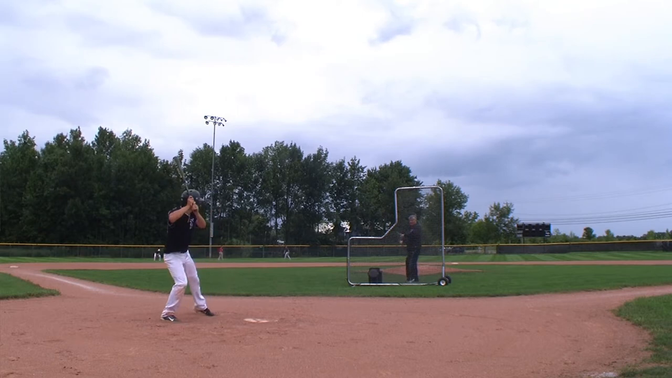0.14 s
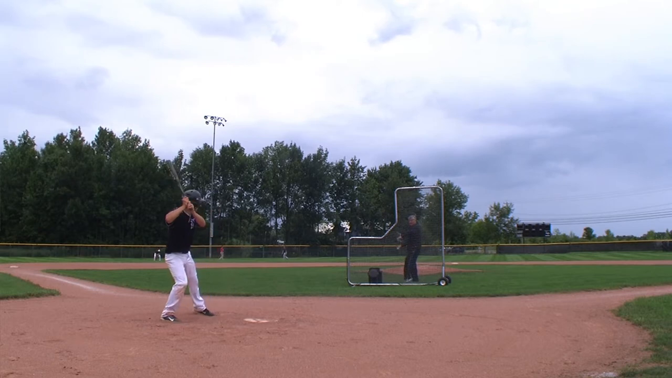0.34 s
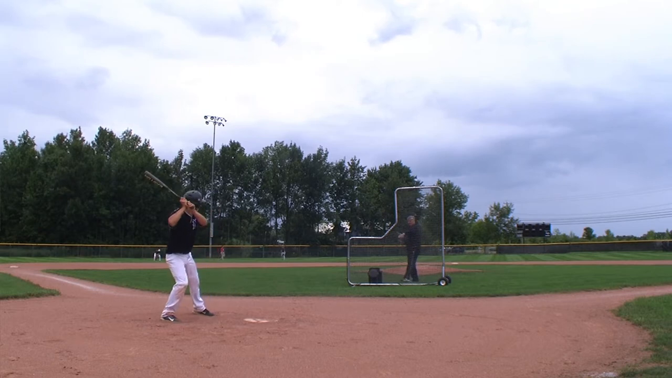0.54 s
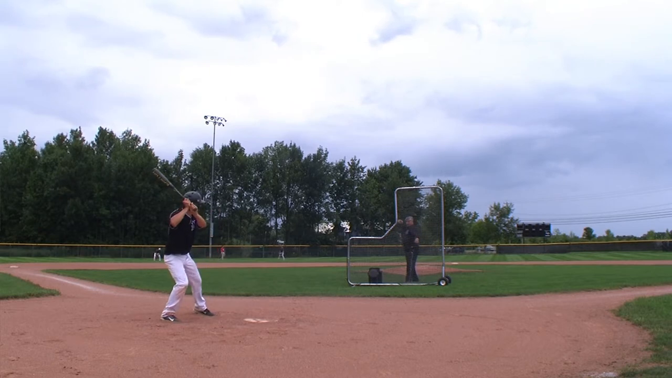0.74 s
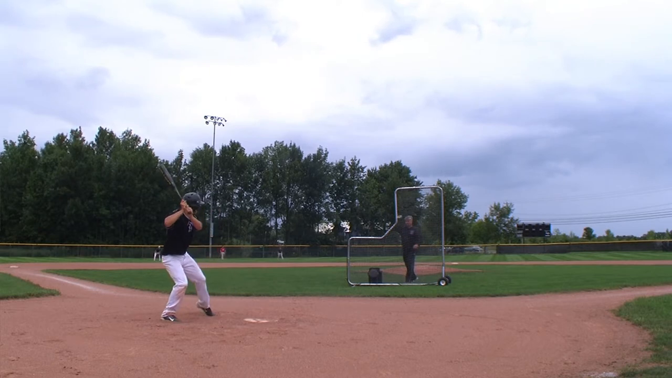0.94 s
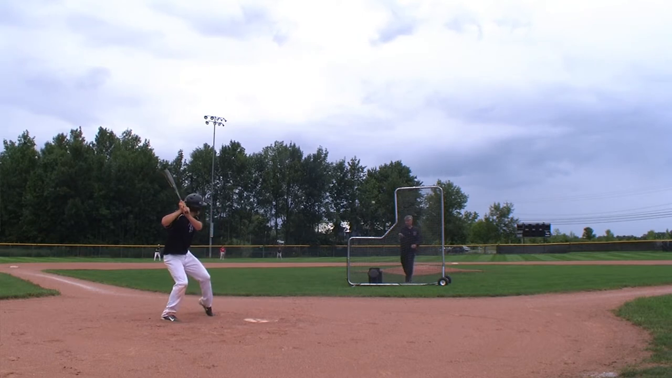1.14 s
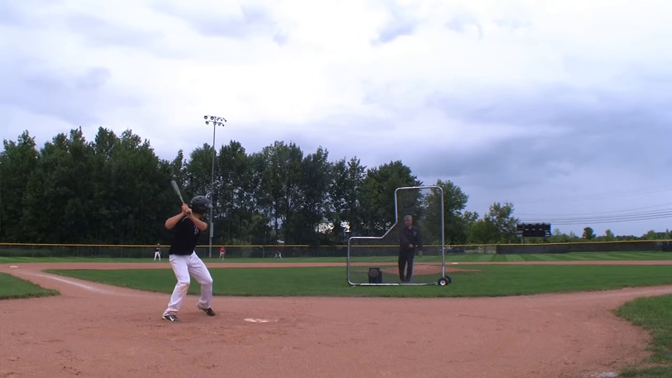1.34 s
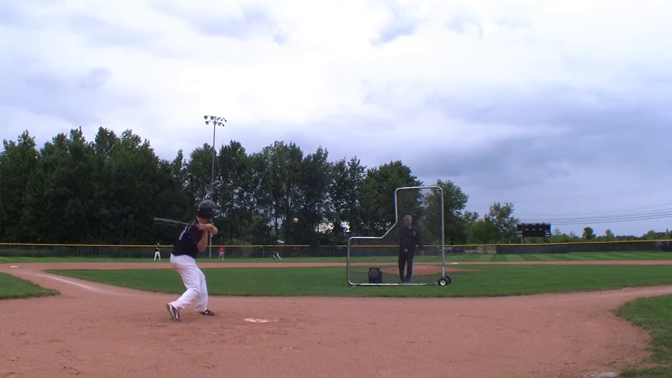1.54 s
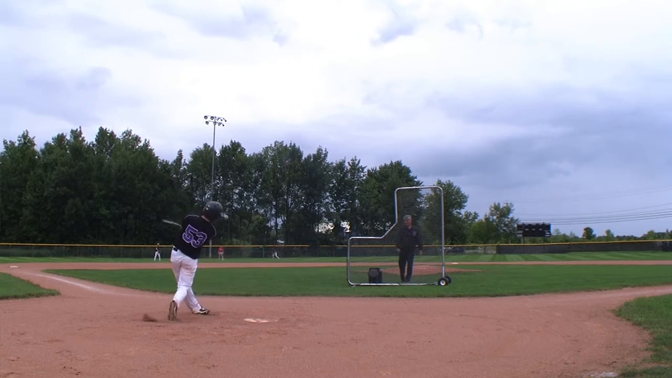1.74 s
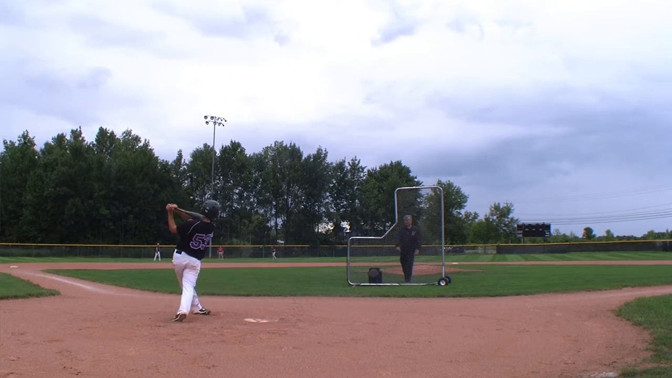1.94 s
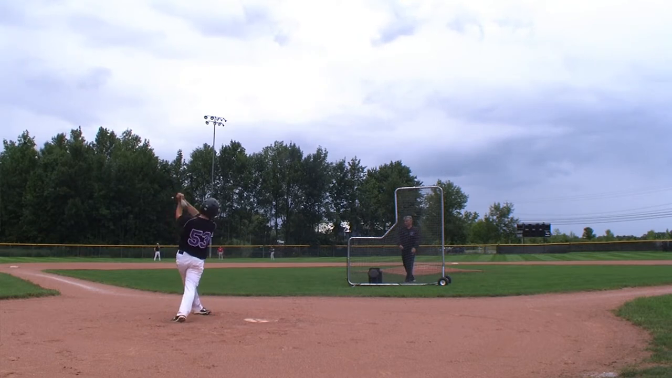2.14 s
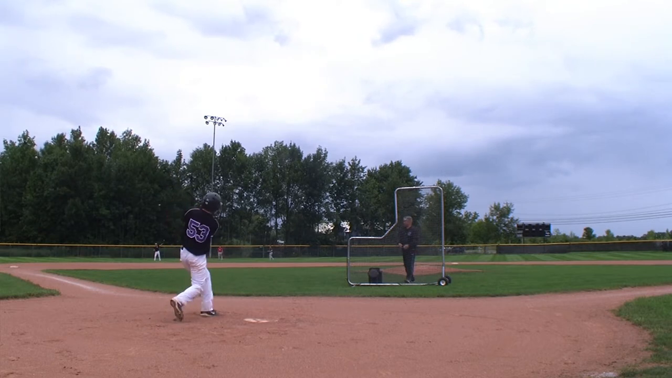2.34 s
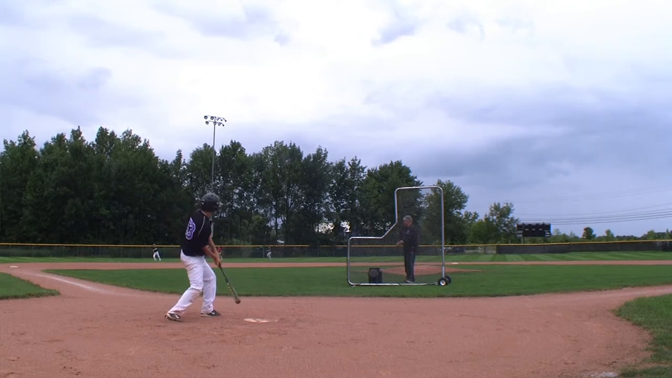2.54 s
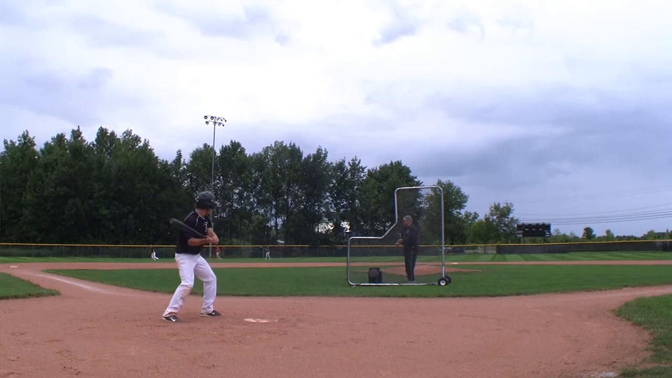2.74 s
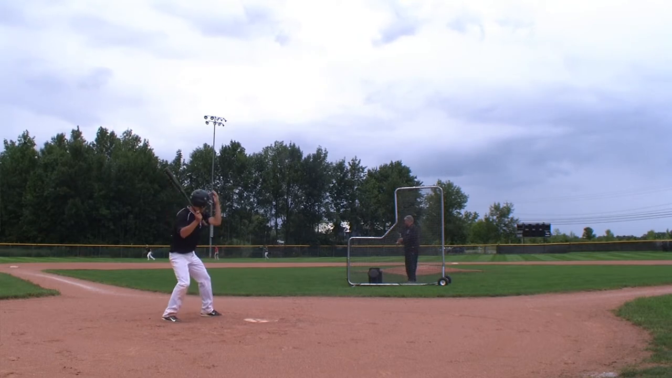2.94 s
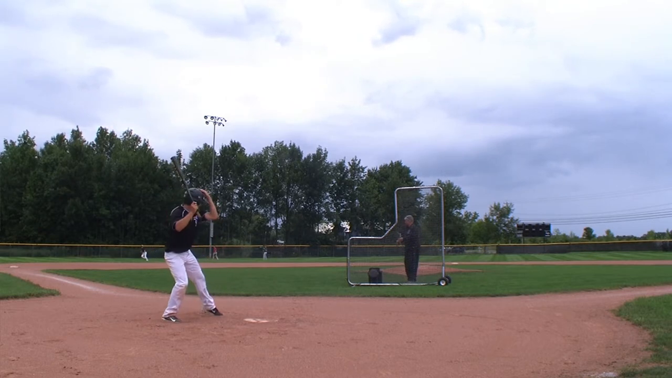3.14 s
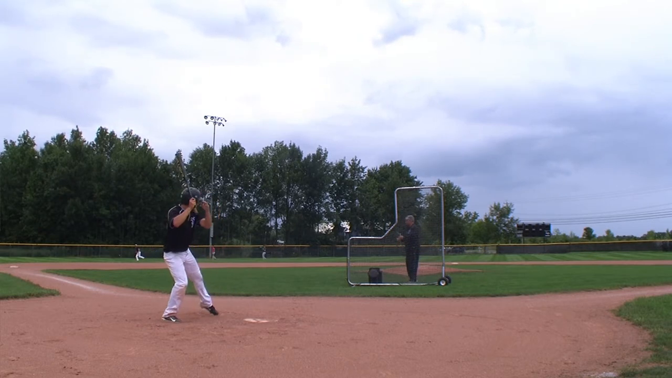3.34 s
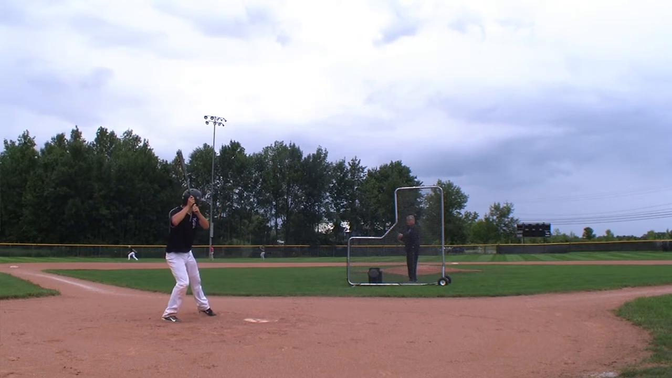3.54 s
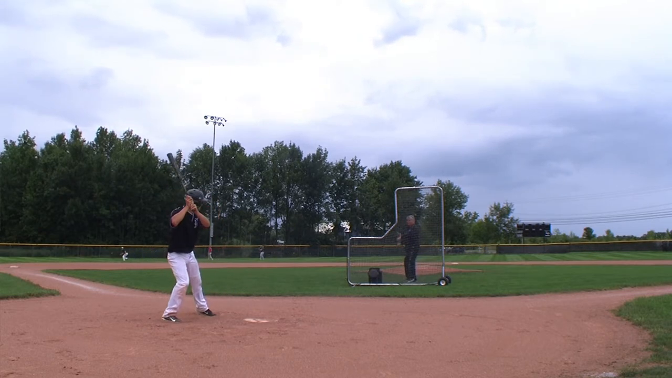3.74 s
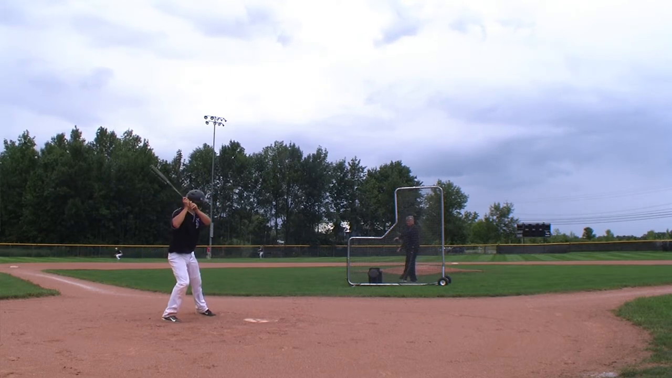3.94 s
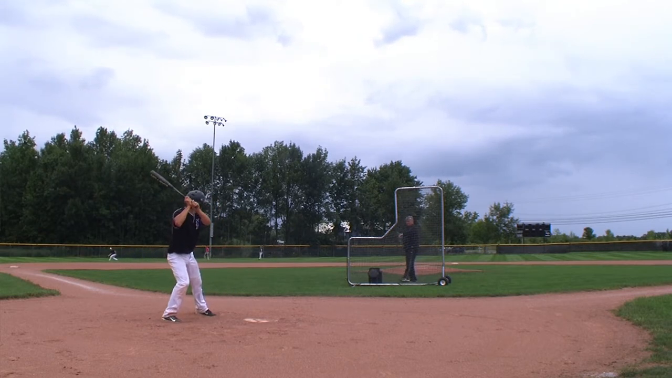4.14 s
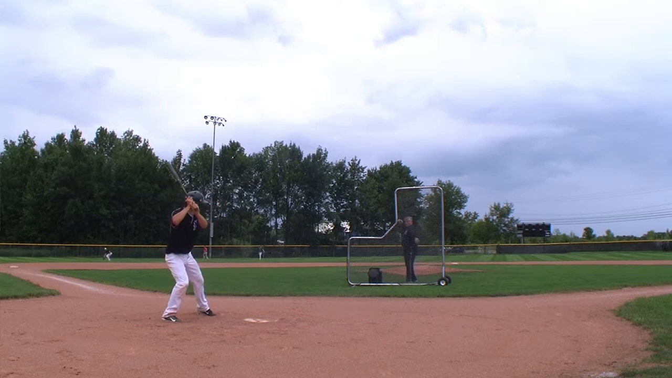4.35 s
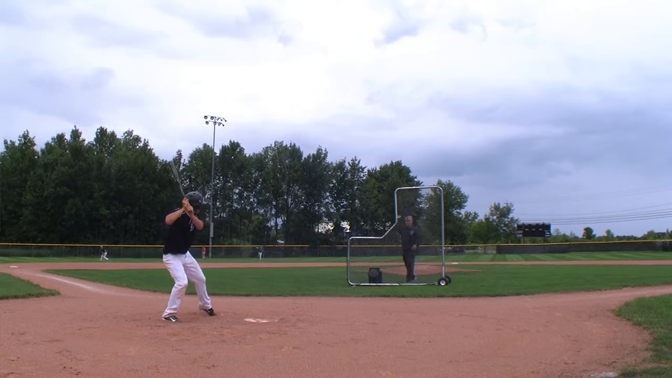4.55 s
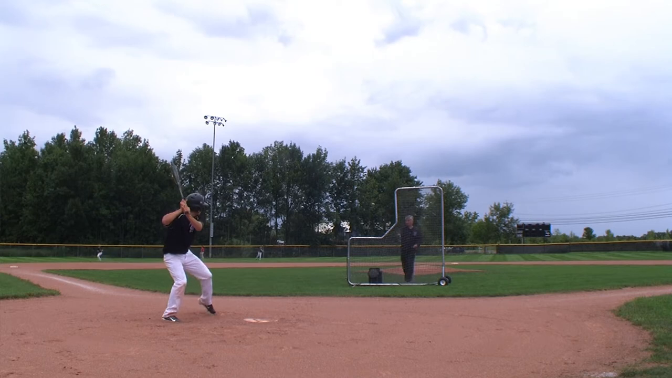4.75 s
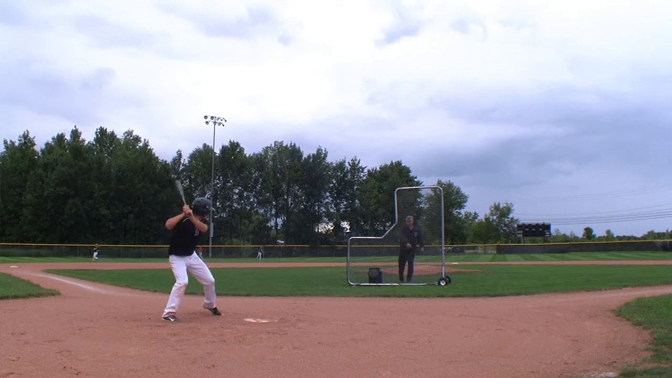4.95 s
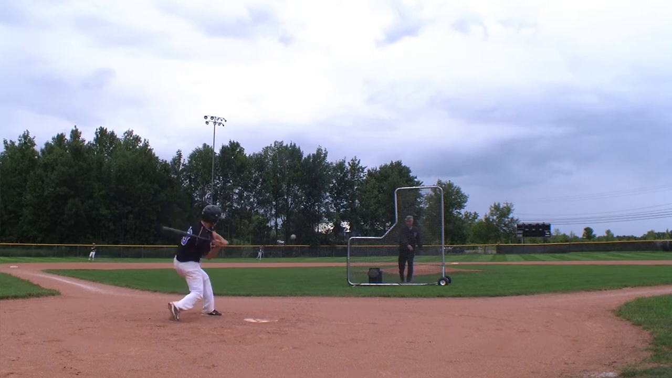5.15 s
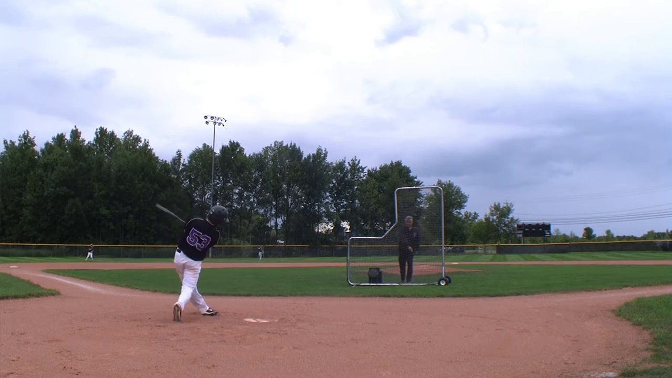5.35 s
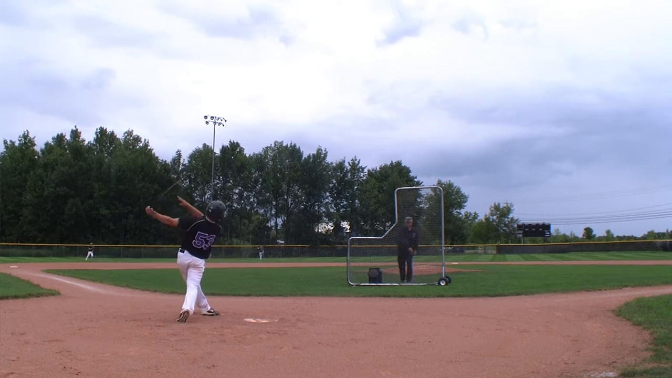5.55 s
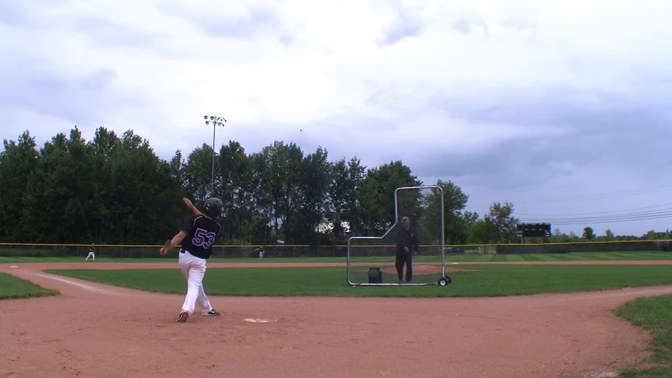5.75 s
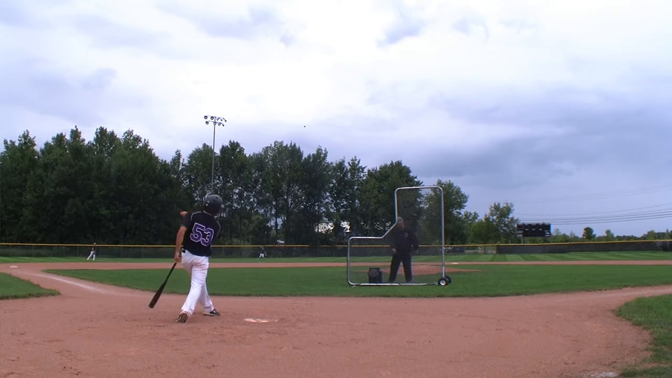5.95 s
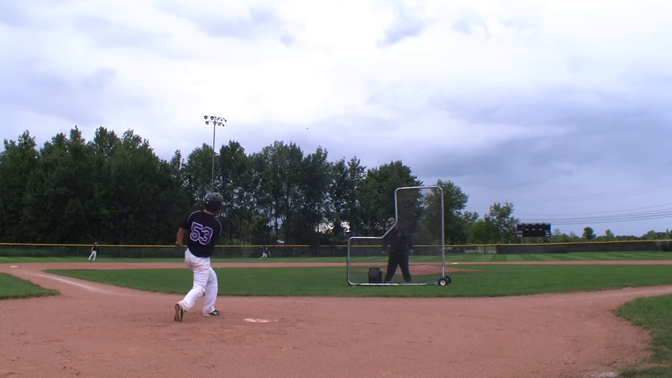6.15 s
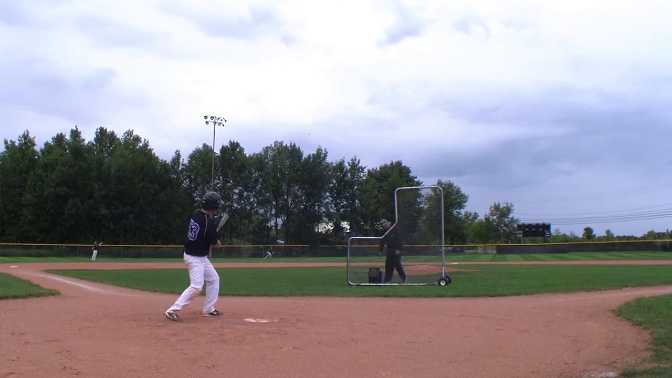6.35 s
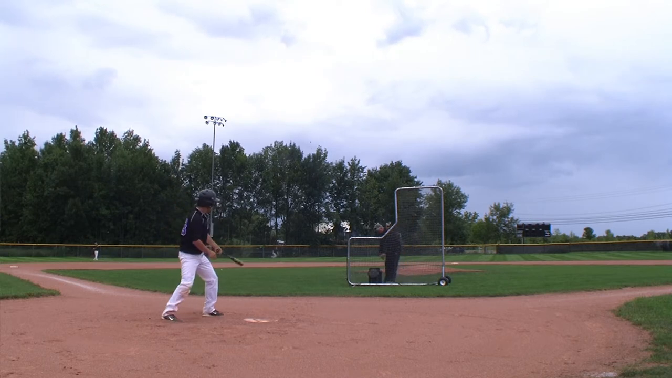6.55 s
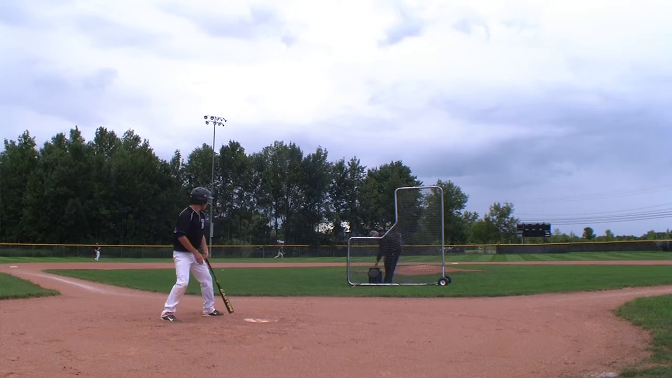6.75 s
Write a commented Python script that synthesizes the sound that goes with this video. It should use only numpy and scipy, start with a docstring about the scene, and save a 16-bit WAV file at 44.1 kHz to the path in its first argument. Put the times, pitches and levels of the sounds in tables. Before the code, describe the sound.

Batting practice outdoors: two short, bright, clanking metal bat blows, several seconds apart, both clipping a nearby microphone. Each is answered by quick slaps from fences, a diffuse tree-line wash and faint late pitched echoes from slatted stands. Between them are dull little thuds, gritty shoe scuffs and thin descending bird whistles over low outdoor air, distant bird chatter and a wavering far hum.

```python
"""A metal bat cracks against two pitches on an open ball field: fast-fading tones plus noise, clipped by overload.
Smeared copies make the echoes from fences and walls, shaped noise the long wash from the trees,
and bands of noise the ring of slatted stands and fences, some of it half a second late.
Around the hits: thuds (sines with puffs of noise), shoes scuffing dirt (grainy hiss), a small bird (sliding
sines), far birds and outdoor air (noise), and a far hum (a wavering sine and narrow noise)."""
import sys
import numpy as np
from scipy import signal
from scipy.fft import rfft, irfft, next_fast_len
from scipy.io import wavfile

SR = 44100
rng = np.random.default_rng(int(sys.argv[2]) if len(sys.argv) > 2 else 0)


def to_wav(s):
    """Save 16-bit WAV."""
    ch = np.atleast_2d(s).T  # columns
    pcm = np.round(np.clip(ch, -1, 1) * 32767)  # PCM
    wavfile.write(sys.argv[1], SR, pcm.astype(np.int16))


N = 299439  # length in samples

# The ways the bat bends and its barrel flexes, each with its own tone.
# Each row: pitch in Hz, time to fade by 60 dB in seconds, polarity (+1 or -1),
# level in the first hit in dB, level in the second hit in dB (both before the level of the whole hit).
BAT_MODES = [(503, .017, -1, -19, -16.5), (1070, .0173, -1, -3, -8.6), (1605, .018, 1, 1.2, .2),
             (2067, .0051, -1, 6, 10.5), (2580, .0048, 1, 6.7, 14.6), (2945, .019, -1, -6, 5.7),
             (3850, .0125, 1, -6, -13), (8000, .011, 1, -18, -13)]


def amp(db):
    """Turn decibels into a plain factor."""
    return 10 ** (np.asarray(db) / 20)


def unit(x):
    """Scale x to an rms of 1."""
    return x / np.sqrt(np.mean(x ** 2) + 1e-20)


def seconds(length):
    """Time axis of a given length in seconds."""
    return np.arange(int(length * SR)) / SR


def curve(rows, t):
    """Join (seconds, value) rows by straight lines."""
    return np.interp(t, *np.transpose(rows))


def colour(points):
    """Make a frequency response through (Hz, dB) points on a log axis."""
    f, db = np.transpose(points)
    return lambda hz: amp(np.interp(np.log(hz + 1), np.log(f), db))


def filtered(x, response):
    """Multiply the spectrum of x by a response of frequency."""
    size = next_fast_len(len(x) + 8192)  # room for the filter's tail
    spectrum = rfft(x, size) * response(np.fft.rfftfreq(size, 1 / SR))
    return irfft(spectrum, size)[:len(x)]


def dulled(x, top_hz):
    """Weaken the treble above top_hz with a causal low-pass."""
    low_pass = signal.butter(2, min(top_hz, SR / 2 - 1), fs=SR, output="sos")
    return signal.sosfilt(low_pass, x)


def band(size, centre_hz, width_hz):
    """Noise of rms 1 around one frequency; centred on 0 Hz it is a slow random drift."""
    noise = rng.standard_normal(size)
    return unit(filtered(noise, lambda hz: 1 / (1 + ((hz - centre_hz) / width_hz) ** 4)))


def swell(t, rise_s, t60):
    """Envelope that rises from t = 0 and dies away."""
    t = np.maximum(t, 0)
    return (1 - np.exp(-t / rise_s)) * amp(-60 * t / t60)


def add(track, s, x):
    """Mix x into the track at s seconds."""
    part = track[round(s * SR):][:len(x)]
    part += x[:len(part)]


def batting():
    """Each hit with the field's answer; the bat's angle decides what is beamed outward."""
    # The two moments when bat meets ball.
    # Each row: start in seconds, level of the whole hit in dB, then levels within the hit in dB:
    # crack towards the microphone, ring towards the field, crack towards the field, wash from the trees.
    hits = [(1.8494, 0, -21, 0.5, 8, -33), (5.4196, 0.5, -20.5, 1, 10.5, -31.5)]
    # Tones the barrel beams towards the field, one list for each hit.
    # Each row: pitch in Hz, width in Hz, level in dB relative to the other rows (also scaled by the width).
    beams = [
        [(865, 120, -19), (1083, 140, -12), (1590, 120, 0.5), (2313, 540, -13.5), (2955, 150, -5),
         (3908, 154, -7.5), (4700, 450, -26)],
        [(510, 170, -22.5), (816, 200, -20.5), (1059, 180, -9), (1626, 150, 1), (2320, 300, -5), (2960, 178, 1),
         (3880, 240, -3.5), (4400, 500, -11.5)],
    ]
    out = np.zeros(N)
    for k, (s, db, near_db, ring_db, crack_db, wash_db) in enumerate(hits):
        mode_db = [mode[3 + k] for mode in BAT_MODES]
        direct = bat(mode_db, near_db)
        outward = beam(beams[k], ring_db, crack_db)
        wash = amp(wash_db) * trees(outward)
        for sound in (direct, walls(outward), wash, slats(outward)):
            add(out, s, amp(db) * sound)
    return out


def bat(mode_db, crack_db, crack_t60=0.011, crack_hz=7000, crack_low_hz=2800):
    """One blow: the contact point sets the modes' strengths; ball and hands damp them fast."""
    t = seconds(.06)
    ring = np.zeros(len(t))
    for (hz, t60, polarity, *_), db in zip(BAT_MODES, mode_db):
        fade = amp(db - 60 * t / t60)
        ring += np.sign(polarity) * fade * np.sin(2 * np.pi * hz * t)
    hiss = filtered(rng.standard_normal(len(t)), lambda hz: hz ** 2 / (hz ** 2 + crack_low_hz ** 2))
    crack = unit(dulled(hiss, crack_hz)) * amp(crack_db - 60 * t / crack_t60)
    return ring + crack


def beam(resonances, ring_db, crack_db, low_hz=4000, top_hz=11000):
    """The same blow as it leaves the barrel outward: a sharp click and a ring of damped tones."""
    t = seconds(.06)
    ring = np.zeros(len(t))
    for k, (hz, width, db) in enumerate(resonances):
        fade = np.exp(-np.pi * width * t)  # a wider resonance dies faster
        ring += (-1) ** k * amp(db) * width * fade * np.sin(2 * np.pi * hz * t)
    step = np.exp(-2 * np.pi * low_hz * t)
    crack = dulled(np.diff(step, prepend=0), top_hz)
    ring_start_rms = np.sqrt(np.mean(ring[t < .004] ** 2))
    return amp(ring_db) * ring / ring_start_rms + amp(crack_db) * crack / np.linalg.norm(crack)


def walls(blow, low_hz=600):
    """Flat walls return a sharp copy, fences and posts a smeared one; far echoes are duller, bass passes by."""
    # Echoes from fences and walls.
    # Each row: delay in seconds, smear (decay time) in seconds, level in dB before the treble and bass are cut.
    echo_rows = [(0.0407, .002, -37.5), (.052, 0.011, -27.5), (.0622, 0.0055, -23), (0.1278, 0.0016, -22.5),
                 (.1932, 0.00091, -46), (.238, 0.0069, -38), (0.307, 0.015, -36.5)]
    # The treble limit at the reference delay; it falls as a power of the delay.
    top_hz, reference_s, dulling = 8000, 0.043, .85
    t = seconds(.05)
    out = np.zeros(SR)
    for delay, smear, db in echo_rows:
        scatter = rng.standard_normal(len(t)) * np.exp(-t / smear)
        scatter[0] += 3  # the mirror part
        echo = signal.fftconvolve(blow, scatter)
        echo *= np.linalg.norm(blow) / np.linalg.norm(echo)  # as much energy as the blow
        add(out, delay, amp(db) * dulled(echo, top_hz * (reference_s / delay) ** dulling))
    return filtered(out, lambda hz: 1j * hz / (low_hz + 1j * hz))


def trees(blow, loss_db=55, loss_hz=8000, clump_db=2.5):
    """Countless small reflections in clumps; air and leaves take more treble the longer the path."""
    # Scattering from the ground, the near trees and the far tree line.
    # Each row: arrival in seconds, rise time in seconds, level in dB relative to the other rows,
    # time to fade by 60 dB in seconds (before the extra loss of treble).
    wash_rows = [(.005, .005, -5, .9), (.122, .012, -2.5, 1.7), (0.549, .03, -15.5, 1.9)]
    # The colour the trees give the wash. Each row: frequency in Hz, relative level in dB.
    wash_colour = [(150, -24.5), (450, -2), (780, 7), (1100, 1.5), (1550, -5), (1780, -0.5), (2200, -1.5),
                   (3000, -1), (3900, -5.5), (5000, 1.5), (9000, 3), (15000, -8.5)]
    size = int(1.4 * SR)
    reflections = rng.standard_normal(size) * amp(clump_db * band(size, 0, 44))
    hz, delay, spectrum = signal.stft(reflections, SR, nperseg=256)
    # loss_db is the loss after one second at loss_hz
    loss = loss_db * delay * (hz[:, None] / loss_hz) ** 2.4
    power = sum((amp(db) * swell(delay - arrival, rise, t60)) ** 2 for arrival, rise, db, t60 in wash_rows)
    gain = np.sqrt(power) * amp(-loss) * colour(wash_colour)(hz)[:, None]
    tail = signal.istft(spectrum * gain, SR, nperseg=256)[1]
    return signal.fftconvolve(blow, tail / np.linalg.norm(tail))


def slats(blow):
    """Rows of evenly spaced slats turn the crack into late pitched echoes."""
    # Echoes from slatted stands and fences.
    # Each row: delay in seconds, rise time in seconds, pitch in Hz, width in Hz, level in dB,
    # time to fade by 60 dB in seconds.
    slat_rows = [(.205, .02, 850, 170, -45, .6), (.52, 0.045, 1770, 90, -55.5, 1.1),
                 (.545, .025, 3350, 110, -53.5, .7)]
    t = seconds(1.4)
    answer = np.zeros(len(t))
    for delay, rise, hz, width, db, t60 in slat_rows:
        tail = band(len(t), hz, width) * swell(t - delay, rise, t60)
        answer += amp(db) * tail / np.linalg.norm(tail)
    return signal.fftconvolve(blow, answer)


def thuds(dirt_db=-9):
    """A dead knock, which is a fast-fading sine, with a puff of dirt made of noise."""
    # Soft thuds of balls and feet.
    # Each row: start in seconds, level in dB, pitch in Hz, time for the knock to fade by 60 dB in seconds.
    thud_rows = [(0.194, -46, 606, .025), (0.657, -50, 520, 0.032), (1.747, -46, 600, 0.021),
                 (2.515, -41.5, 1480, 0.065), (2.555, -50, 515, 0.028), (3.324, -46, 730, 0.014),
                 (3.771, -50, 500, .045), (6.256, -47.5, 510, .033), (6.357, -55, 554, .025)]
    out, t = np.zeros(N), seconds(0.15)
    for s, db, hz, t60 in thud_rows:
        knock = np.sin(2 * np.pi * hz * t) * amp(-60 * t / t60)
        puff = band(len(t), hz, 290) * amp(dirt_db - 60 * t / 0.1)
        add(out, s, amp(db) * (knock + puff))
    return out


def scuffs(grit_hz=9200, grit_width_hz=2200, grain_db=4):
    """Grit hisses under a turning shoe: high noise with grains of uneven strength."""
    # Shoes scuffing the dirt.
    # Each row: start in seconds, length in seconds, level in dB before the fade in and out.
    scuff_rows = [(.38, 0.074, -73), (.828, .012, -66.5), (1.365, .012, -66), (2.515, 0.11, -67.5),
                  (2.587, .16, -73), (3.022, 0.15, -69.5), (3.22, .11, -67), (4.436, .1, -72)]
    out = np.zeros(N)
    for s, length, db in scuff_rows:
        t = seconds(length)
        strength = amp(grain_db * rng.standard_normal(len(t)))
        grains = unit(strength * band(len(t), grit_hz, grit_width_hz))
        add(out, s, amp(db) * grains * np.sin(np.pi * t / length))
    return out


def bird(vary_db=0.7, leaves_db=-10, leaves_t60=0.13):
    """Each phrase slows and nears a settled pitch, blurred by the leaves round the perch."""
    # Phrases of falling bird notes.
    # Each row: start in seconds, number of notes, first gap in seconds, start pitch of the first note in Hz,
    # settled start pitch in Hz, level of the first note in dB before random variation.
    phrase_rows = [(.214, 5, .105, 5100, 4400, -59.3), (1.538, 3, .118, 4920, 4100, -61),
                   (3.075, 3, .116, 4250, 4300, -63.3), (4.152, 5, .114, 4980, 4120, -62)]
    # From note to note: seconds added to the gap, share of the pitch difference left, gain in dB.
    slowing_s, settle, grow_db = .005, .35, .3
    out = np.zeros(N)
    for s, count, gap, first_hz, settled_hz, db in phrase_rows:
        for k in range(count):
            start_hz = settled_hz + (first_hz - settled_hz) * settle ** k
            note_s = s + k * gap + slowing_s * k * (k - 1) / 2
            note_db = db + grow_db * k + vary_db * rng.standard_normal()
            add(out, note_s, amp(note_db) * whistle(start_hz))
    t = seconds(.2)
    leaves = rng.standard_normal(len(t)) * amp(-60 * t / leaves_t60)
    return out + amp(leaves_db) * signal.fftconvolve(out, leaves / np.linalg.norm(leaves))[:N]


def whistle(start_hz, length_s=.043, slide_hz=1170, slide_from_hz=4300):
    """One thin note that slides down, a little faster towards its end."""
    u = seconds(length_s) / length_s  # runs from 0 to 1
    # a note starting at slide_from_hz falls by slide_hz; lower notes fall further
    fall_hz = slide_hz * (slide_from_hz / start_hz) ** 2
    pitch = start_hz - fall_hz * u ** 1.15
    return np.sqrt(np.abs(np.sin(np.pi * u))) * np.sin(2 * np.pi * np.cumsum(pitch) / SR)


def far_birds(level_db=-77, centre_hz=4500, flicker_db=3):
    """Chatter from the tree line, blurred into a narrow band of noise with a flickering level."""
    flicker = amp(flicker_db * band(N, 0, 12))
    return amp(level_db) * unit(band(N, centre_hz, 250) * flicker)


def background(hum_db=-4, hum_hz=551, low_hum_db=-78.5, low_hum_hz=378, whine_db=-82, drone_db=-73):
    """Outdoor air as noise, a far machine's drone and two wavering hums, and a thin whine."""
    # Level of the far hum. Each row: time in seconds, level in dB before hum_db is added.
    hum_level = [(0, -62), (.45, -72.5), (.7, -65), (1.5, -64.5), (3.0, -73), (4.0, -76), (4.3, -63.5),
                 (4.8, -77.5), (6.5, -80), (6.79, -64)]
    # Colour of the outdoor air. Each row: frequency in Hz, relative level in dB per Hz.
    air_colour = [(20, -52), (40, -30.5), (60, -24.5), (110, -8.5), (200, -5.5), (300, -7), (380, -7.5),
                  (550, -8), (900, -5.5), (1800, -8), (4400, -12), (6500, -18.5), (10000, -24.5),
                  (15400, -31.5)]
    # Level of the outdoor air. Each row: time in seconds, level in dB.
    air_level = [(0, -58.5), (2.8, -58.5), (3.7, -59.5), (4.6, -58.5), (6.79, -58)]
    t = np.arange(N) / SR
    air = amp(curve(air_level, t)) * unit(filtered(rng.standard_normal(N), colour(air_colour)))
    pitch = hum_hz + 3 * band(N, 0, 4.8)  # wavers by 3 Hz rms
    hum_wave = np.sqrt(2) * np.sin(2 * np.pi * np.cumsum(pitch) / SR)  # rms 1
    hum = amp(curve(hum_level, t) + hum_db) * hum_wave
    low_hum = amp(low_hum_db) * band(N, low_hum_hz, 3)
    drone = amp(drone_db) * band(N, 165, 77)
    whine = amp(whine_db) * band(N, 7870, 35)
    return air + hum + low_hum + drone + whine


def scene(hiss_db=-75.0):
    """The field reaches both channels alike; each has a trace of its own hiss."""
    field = batting() + thuds() + scuffs() + bird() + far_birds() + background()
    return field + amp(hiss_db) * rng.standard_normal((2, N))


def record(dry, top_hz=15750):
    """The cracks clip at full scale; then a steep low-pass removes the treble above top_hz."""
    clipped = np.clip(dry, -1, 1)
    band_limit = signal.ellip(10, .1, 90, top_hz, fs=SR, output="sos")
    return np.array([signal.sosfilt(band_limit, channel) for channel in clipped])


dry = scene()
out = record(dry)
to_wav(out)
```